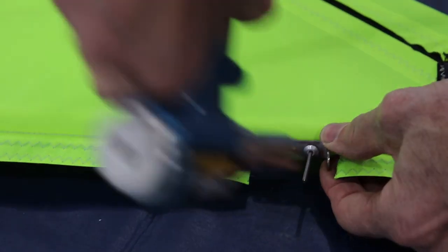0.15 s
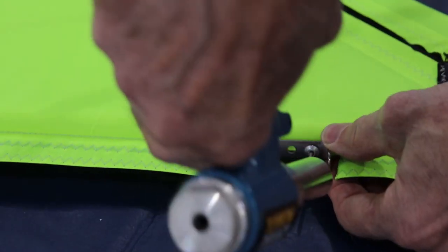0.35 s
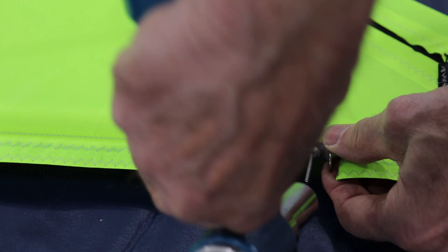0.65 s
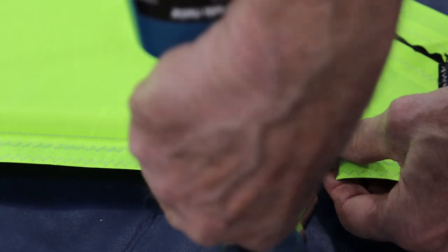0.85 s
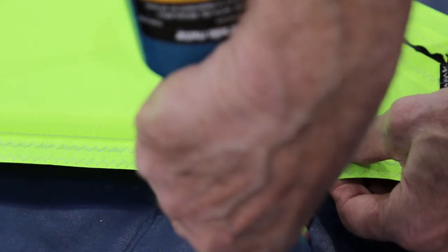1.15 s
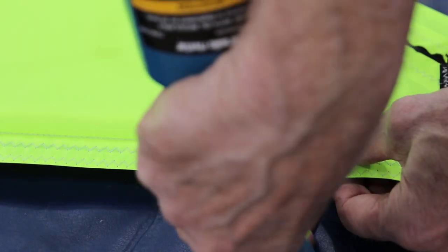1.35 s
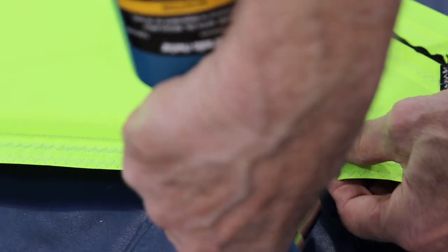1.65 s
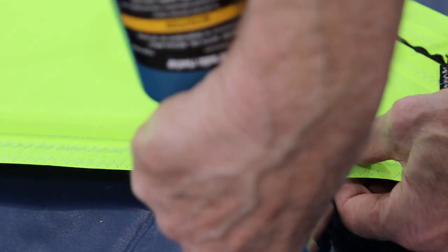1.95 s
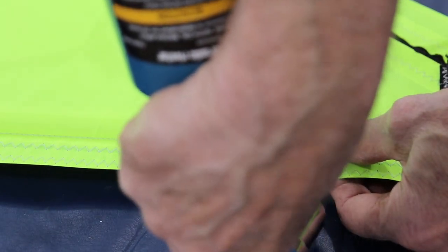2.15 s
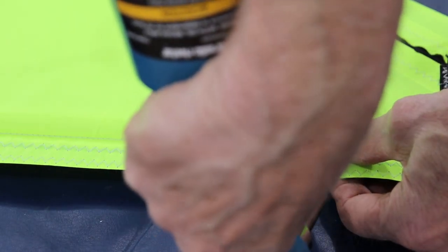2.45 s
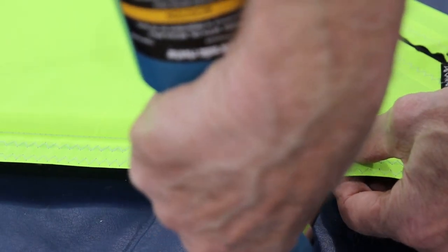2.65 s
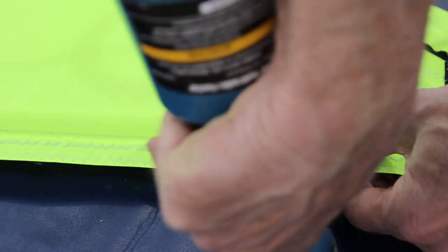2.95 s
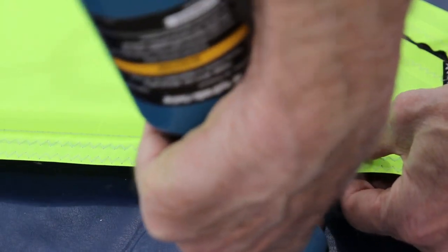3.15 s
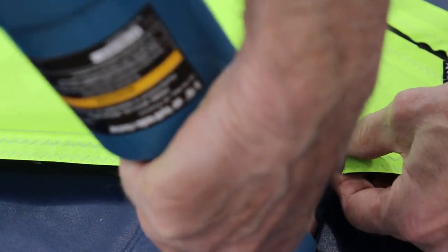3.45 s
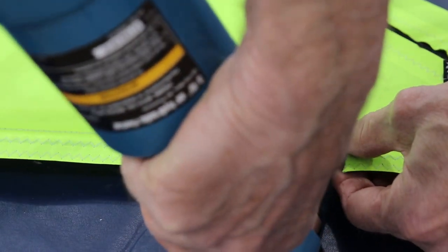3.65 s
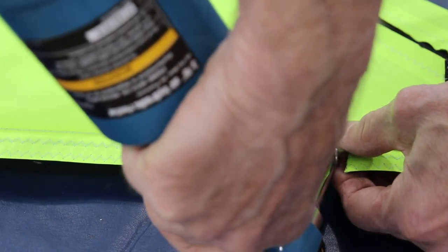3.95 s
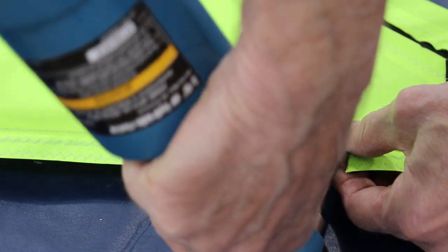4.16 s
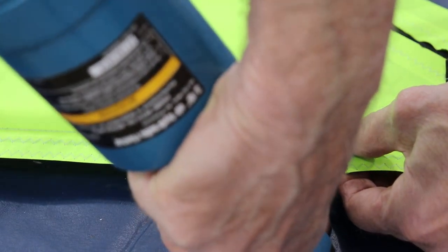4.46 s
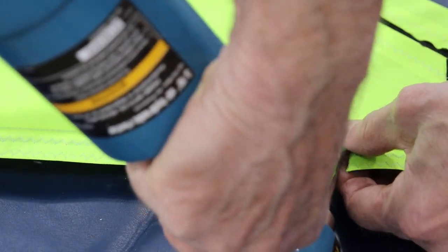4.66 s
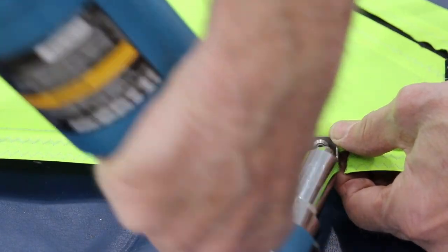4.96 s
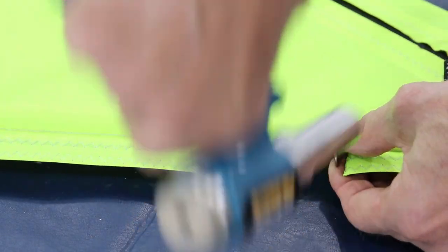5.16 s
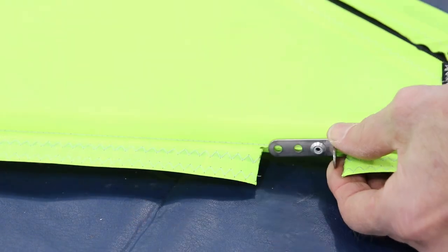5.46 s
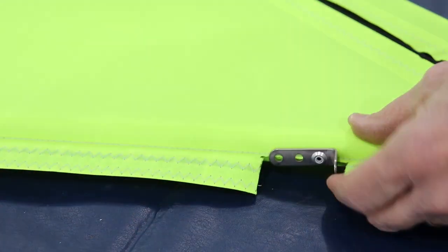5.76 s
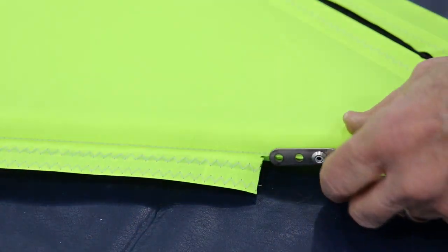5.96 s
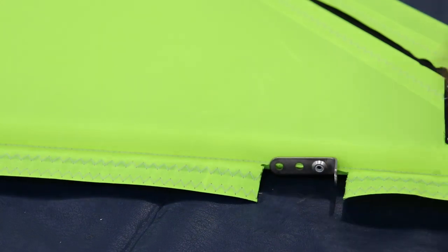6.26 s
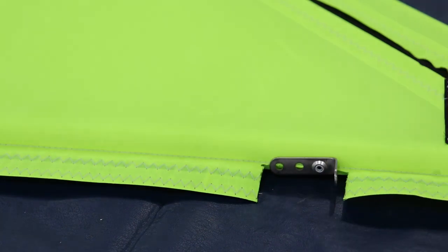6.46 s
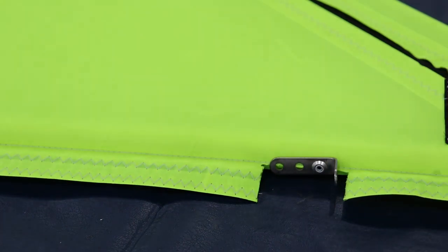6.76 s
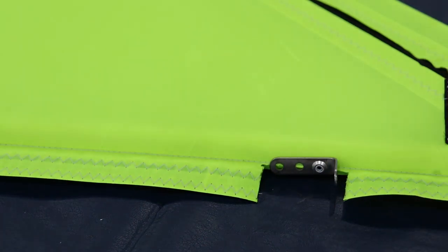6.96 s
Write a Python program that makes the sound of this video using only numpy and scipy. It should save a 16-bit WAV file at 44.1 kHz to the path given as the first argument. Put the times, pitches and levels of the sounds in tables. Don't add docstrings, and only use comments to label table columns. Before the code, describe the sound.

Handling scuffs and metallic ticks, a short burst of compressed air, a violent crack with ringing reverb, then a sweeping jet of venting air ends abruptly.

```python
import sys
import numpy as np
from scipy import signal
from scipy.fft import rfft, irfft, next_fast_len
from scipy.io import wavfile
from scipy.ndimage import map_coordinates

SR = 44100
rng = np.random.default_rng(int(sys.argv[2]) if len(sys.argv) > 2 else 0)


def volts_from_decibels(level):
    exponent = np.asarray(level, float) / 20
    return 10 ** exponent


def put_to_file(sound):
    columns = np.atleast_2d(sound).T
    safe = np.clip(columns, -1, 1)
    whole_steps = np.round(safe * 32767)
    wavfile.write(sys.argv[1], SR, whole_steps.astype(np.int16))


N = 312864
TIME = np.arange(N) / SR
PADDED = next_fast_len(N)
SNAP_S = 4.7418

# frequency in Hz, width in Hz, level in dB.
BODY = [(792, 306, 5.5), (1400, 630, 5.5), (1720, 390, 5.5), (2290, 277, 4.5)]


def unit(x):
    return x / np.sqrt(np.mean(x ** 2) + 1e-20)


def columns(rows):
    s, *rest = np.transpose(rows)
    return [np.interp(TIME, s, c) for c in rest]


def at_hz(points, hz):
    points = np.array(points)
    return np.interp(np.log(hz + 1), np.log(points[:, 0]), points[:, 1])


def noise(spectrum):
    white = rfft(rng.standard_normal(PADDED))
    colour = volts_from_decibels(at_hz(spectrum, np.fft.rfftfreq(PADDED, 1 / SR)))
    return unit(irfft(white * colour, PADDED)[:N])


def band(x, low_hz, high_hz, order=2):
    edges_hz = [low_hz, min(high_hz, .45 * SR)]
    return signal.sosfilt(signal.butter(order, edges_hz, "band", fs=SR, output="sos"), x)


def drift(rate_hz):
    return unit(band(rng.standard_normal(N + SR), rate_hz / 8, rate_hz, order=1)[SR:])


def resonate(x, modes):
    out, power = 0, 0
    for k, (hz, width_hz, db) in enumerate(modes):
        r = np.exp(-np.pi * width_hz / SR)
        poles = [2, -4 * r * np.cos(2 * np.pi * hz / SR), 2 * r * r]
        mode = signal.lfilter([1 - r * r, 0, r * r - 1], poles, x + 1e-18)
        out = out + (-1) ** k * volts_from_decibels(db) * mode
        power += volts_from_decibels(db) ** 2 * np.pi * width_hz / SR
    return out / np.sqrt(power)


def dying(start, t60):
    out, first = np.zeros(N), int(np.ceil(start * SR))
    part = TIME[first:first + int(2 * t60 * SR)] - start
    out[first:first + len(part)] = volts_from_decibels(-60 * part / t60)
    return out


def swell(rows):
    coarse = TIME[::32]
    strokes = sum(volts_from_decibels(db - 25 * np.maximum((s - coarse) / rise, (coarse - s) / fall))
                  for s, rise, fall, db in rows)
    return np.interp(TIME, coarse, strokes)


def split(x, centres_hz):
    spectrum, hz = rfft(x, PADDED), np.log(np.fft.rfftfreq(PADDED, 1 / SR) + 1)
    return [irfft(spectrum * np.interp(hz, np.log(centres_hz), one), PADDED)[:N]
            for one in np.eye(len(centres_hz))]


def ring(modes):
    tones = sum(volts_from_decibels(db) * dying(s, t60) * np.sin(2 * np.pi * hz * (TIME - s)) for s, hz, db, t60 in modes)
    return volts_from_decibels(3.7 * drift(60)) * tones


def shop_air():
    # frequency in Hz, density in dB per Hz.
    air_colour = [(15, -35), (25, -2.5), (166, -2.5), (285, -2.5), (344, -2.5), (405, -4.5), (695, -5.5),
                  (1020, -7.5), (1100, -7), (2550, -11), (3250, -13.5), (12900, -19), (16000, -20)]
    return volts_from_decibels(-41.5 + 0.56 * drift(0.87)) * noise(air_colour)


def shop_air_side():
    # frequency in Hz, density in dB per Hz.
    side_colour = [(15, -29), (25, 5.5), (263, -8), (1260, -14), (9840, -14.5), (11600, -18), (12500, -38),
                   (13600, -23), (16000, -33)]
    return volts_from_decibels(-55) * noise(side_colour)


def coupling_leak():
    # time in seconds, level in dB.
    leak_curve = [(0, -32), (.5, -37), (1.4, -34), (3.38, -38), (3.44, -77), (3.86, -38), (3.95, -60),
                  (4.5, -70)]
    # frequency in Hz, width in Hz, level in dB.
    leak_modes = [(2260, 270, -4.5), (2350, 610, -9.5)]
    level_db = columns([*leak_curve, (4.55, -80)])[0]
    return volts_from_decibels(level_db + 1.3 * drift(37)) * resonate(rng.standard_normal(N), leak_modes)


def reverberation():
    # frequency in Hz, density in dB per Hz.
    hall_colour = [(60, -26), (121, -15), (233, -11), (346, -4.5), (900, -1.5), (1340, -4), (1750, 4.5),
                   (2250, -4.5), (2750, -2.5), (3400, -9), (5590, -10), (7750, -10), (10500, -18),
                   (16000, -31)]
    # frequency in Hz, t60 in seconds.
    hall_t60 = [(100, 0.93), (500, 1.29), (1500, 1.35), (3000, 1.36), (6000, 0.88), (12000, 0.42)]
    centres = np.geomspace(100, 14000, 11)
    parts = split(noise(hall_colour), centres)
    return sum(part * dying(0, at_hz(hall_t60, hz)) for hz, part in zip(centres, parts))


def table(gain):
    # start in seconds, frequency in Hz, level in dB, rise in seconds, t60 in seconds.
    knock_rows = [(3.005, 110, -26, .006, .09), (3.625, 200, -34, .004, .06), (3.625, 65, -33, .006, .1),
                  (.185, 140, -26, .005, .2), (6.472, 62, -28, .006, .25), (4.662, 90, -22, .006, .08),
                  (4.603, 420, -24, .004, .12), (5.41, 200, -30, .01, .15), (5.57, 97, -36, .08, .5),
                  (5.58, 185, -38, .08, .6), (6.47, 165, -19, .008, .13), (6.505, 185, -25, .01, .12),
                  (6.472, 340, -29, .003, .05), (6.579, 310, -18, .002, .035), (6.578, 140, -25, .003, .07)]
    # peak, rise and fall in seconds, level in dB.
    bumps = [
        (0, .1, 2.9, -38),
        (2.97, .1, 0.38, -38),
        (4.6, 0.13, .6, -32.5),
        (5.45, .06, .1, -48),
    ]
    knocks = 0
    for s, hz, db, rise, t60 in knock_rows:
        onset = np.clip((TIME - s) / rise, 0, 1)
        knocks = knocks + volts_from_decibels(db) * dying(s, t60) * onset * np.sin(2 * np.pi * hz * (TIME - s))
    sway = volts_from_decibels(-71) + swell(bumps)
    return knocks + gain * sway * unit(band(rng.standard_normal(N), 5.2, 23.4))


def scuffs(gain):
    # peak, rise and fall in seconds, level in dB,
    # weight on the table in dB.
    rubs = [(0.034, 1, 0.044, -18.5, 0), (0.108, 0.014, 0.068, -27.5, 1.5), (.136, 0.062, 0.013, -24, 5.5),
            (.19, 0.014, 0.93, -43, 4.5), (1.075, .03, 0.067, -42, 2), (1.132, .03, 0.088, -35.5, -16),
            (1.237, 0.026, .09, -32, -22), (1.377, 0.025, 0.087, -32.5, -11), (1.435, 0.027, 0.1, -34, -15),
            (1.693, 0.044, 0.088, -40, -8), (2.58, 0.018, .03, -32, -23), (2.626, 0.047, 0.054, -44, -9),
            (2.88, 0.1, 0.12, -33.5, -11), (2.985, .1, 0.057, -39, -2), (3.03, 0.035, 0.27, -33, -3),
            (3.594, 0.055, 0.12, -39.5, -10), (4.614, 0.096, 0.25, -31.5, 8),
            (4.735, 0.036, 0.015, -40, -6), (5.428, 0.16, 0.018, -21, -10.5),
            (6.36, 0.21, 0.84, -52.5, 12.5), (6.599, 0.022, 0.14, -46.5, 4.5),
            (6.719, 0.096, .02, -53, -16)]
    # peak, rise and fall in seconds, level in dB.
    sleeve = (.42, .9, .8, -44)
    rustle_db, rumble_db, rumble_lingers = -10, -5, 1.53
    body = swell([row[:4] for row in rubs])
    grip = swell([(s, rise, fall, db + weight_db) for s, rise, fall, db, weight_db in rubs])
    rumble = swell([(s, rise, rumble_lingers * fall, db + weight_db + rumble_db)
                    for s, rise, fall, db, weight_db in rubs])
    grit = rng.standard_normal(N) * volts_from_decibels(0.45 * drift(190))
    rustle = volts_from_decibels(rustle_db) * body + swell([sleeve])
    return (body * unit(resonate(grit, BODY))
            + rustle * unit(band(grit, 2600, 6900))
            + gain * rumble * unit(band(rng.standard_normal(N), 78, 270))
            + grip * unit(band(grit, 276, 710)))


def ticks():
    # start in seconds,
    # peak in dB, housing and steel relative to it in dB, t60 in seconds.
    tick_rows = [(0.189, -23, -6, -17, 0.018), (1.054, -9.5, -6.5, -2.5, 0.047),
                 (1.126, -10, -14, -17, 0.042), (1.138, -15, -7, -24, 0.026), (1.237, -18, -10, -16, 0.03),
                 (1.372, -17, -5.5, -21, 0.027), (1.387, -23, -8, 2, 0.035), (1.423, -12, -5, -11, 0.052),
                 (1.441, -15, -6, -24, 0.056), (2.612, -18, -11, -4, 0.036), (3.059, -16, -11, -3, 0.028),
                 (3.629, -31, -7, -15, 0.036),
                 (2.572, -20, -8, 0, .04), (1.409, -5, -6, -14, .035), (2.862, -21, -4, -16, .04),
                  (2.886, -18, -3, -20, .04), (.087, -12, -6, -14, .03), (.101, -12, -4, -14, .05),
                  (2.9965, -10, -6, -6, .025), (3.002, 5, -12, -5, .05), (5.005, -13, -30, 2, .01),
                  (5.08, -11, -30, 2, .012), (6.478, -8, -20, 3, .003), (6.644, -20, -14, 4, .004),
                  (6.664, -13, 0, 0, .005), (6.670, -26, -10, 4, .004), (6.729, -20.5, -25, 5, .016)]
    # frequency in Hz, width in Hz, level in dB.
    steel = [(3500, 2500, 5), (4370, 380, 9), (5620, 860, 12), (7500, 1100, -32), (9800, 1100, -7),
             (12900, 1000, -22)]
    # frequency in Hz, width in Hz, level in dB.
    spring_modes = [(5030, 230, 0), (5760, 720, 1)]
    touches, rattle = tick_rows, rng.standard_normal((3, N))
    rattle[:, [int(np.ceil(row[0] * SR)) for row in touches]] = 3.0
    housing = sum(volts_from_decibels(db + low_db - 3) * dying(s, t60) for s, db, low_db, high_db, t60 in touches)
    nose = sum(volts_from_decibels(db + high_db - 11) * dying(s, .6 * t60) for s, db, low_db, high_db, t60 in touches)
    spring = volts_from_decibels(-37) * dying(3.012, .9)
    return (resonate(housing * rattle[0], BODY) + resonate(nose * rattle[1], steel)
            + resonate(spring * rattle[2], spring_modes))


def steel_rings():
    # start in seconds, frequency in Hz, level in dB, t60 in seconds.
    part_modes = [(0, 1190, -17, .2), (.022, 1230, -17, .1), (3.003, 7570, -42, .15),
                  (3.003, 760, -23, .06), (4.62, 5050, -35, .5), (4.72, 2200, -38, .12),
                  (4.742, 7526, -11, .075), (2.866, 1320, -27, .06), (2.884, 690, -25, .07),
                  (3.006, 1280, -22, .06), (3.056, 1350, -28, .04), (6.729, 9550, -30, .04)]
    return ring(part_modes)


def valve():
    # start, rise, hold and fall t60 in seconds, level in dB.
    puffs = [
        (4.563, 0.014, 0.013, .07, -11.5),
        (4.592, .003, .004, .03, -28),
        (4.661, 0.0047, 0.0027, 0.027, -11.5),
        (5.379, 0.063, 0.0067, 0.18, -11),
    ]
    # frequency in Hz, density in dB per Hz.
    puff_colour = [(180, -53), (300, -11), (528, -14), (1430, -0.5), (2610, -4.5), (3190, 0.5), (8360, 5),
                   (15000, -7.5), (16000, -37)]
    # time in seconds, level in dB.
    fill_curve = [(4.5, -67), (4.56, -38), (4.61, -26), (4.65, -26.5), (4.7, -25.5), (4.74, -31),
                  (4.745, -73)]
    # frequency in Hz, width in Hz, level in dB.
    fill_modes = [(5100, 2700, -8), (7000, 360, 1.5), (9600, 4200, -16.5)]
    shape = 0
    for s, rise, hold, t60, db in puffs:
        opening = np.clip((TIME - s) / rise, 0, 1) ** 2
        closing = volts_from_decibels(-60 * np.maximum(TIME - s - rise - hold, 0) / t60)
        shape = shape + volts_from_decibels(db) * opening * closing
    bursts = shape * volts_from_decibels(0.58 * drift(300)) * noise(puff_colour)
    return bursts + volts_from_decibels(columns(fill_curve)[0]) * resonate(rng.standard_normal(N), fill_modes)


def exhaust():
    # time in seconds, flow in dB, port turned from facing (0) to sideways (1).
    vent = [(5.378, -34, 0.4), (5.47, -24, 0.7), (5.51, -25, 0.01), (5.82, -22, 0.33), (6.0, -23.5, 0.51),
            (6.27, -20, .75), (6.45, -22.5, 0.89), (6.555, -24, .98), (6.59, -38, 0.86)]
    # frequency in Hz, density in dB per Hz.
    jet_colour = [(150, -28), (400, -16.5), (1000, -11), (1800, -8), (3800, 11), (5000, 10.5), (7000, 17.5),
                  (11000, 16.5), (16000, 0)]
    # frequency in Hz, width in Hz, level in dB.
    upper_modes = [(4800, 430, 7.5), (6070, 1400, 1)]
    # frequency in Hz, width in Hz, level in dB.
    lower_modes = [(2150, 450, 0), (2600, 550, -1)]
    # time in seconds, far and near delay in ms.
    echo_ms = [(5.34, 1.15, .45), (5.62, 1.35, .69), (5.72, 1.28, .56), (5.98, 1.0, .19), (6.4, .465, .23),
               (6.52, .37, .21), (6.6, .32, .22)]
    # frequency in Hz, level facing in dB, change when sideways in dB.
    turning = [(1160, -7.5, -8), (2310, -4, 0), (3670, -2.5, -2.5), (5240, 5, -14.5), (7300, 3.5, -15),
               (10200, 6.5, -18.5), (13100, 4, -13.5)]
    (far_ms, near_ms), air = columns(echo_ms), rng.standard_normal(N)
    before, end = (vent[0][0] - .012, -90, 0), (N / SR, -90, 1)
    seep = (vent[-1][0] + .54, -68, 1)
    flow_db, turn = columns([before, *vent, seep, end])

    upper = volts_from_decibels(-3.5 - 48 * (turn - .74) ** 2) * resonate(air, upper_modes)
    lower = volts_from_decibels(-38.5 + 22.5 * turn ** 3) * resonate(resonate(air, lower_modes), lower_modes) / 4
    jet = noise(jet_colour) + upper + lower

    far_echo, near_echo = (map_coordinates(jet, [np.arange(N) - ms * SR / 1000], order=3)
                           for ms in (far_ms, near_ms))
    far = np.clip(.1 + 1.0 * (1.36 - far_ms), 0, .5) * volts_from_decibels(2.3 * drift(11))
    near = .28
    combed = (jet + far * far_echo + near * near_echo) / np.sqrt(1 + far ** 2 + near ** 2)

    gust, out = 0.66 * drift(14), 0
    for part, (hz, facing_db, turn_db) in zip(split(combed, [row[0] for row in turning]), turning):
        level_db = flow_db + facing_db + turn_db * turn + gust + .8 * drift(12)
        out = out + volts_from_decibels(level_db) * unit(part)
    return out


def jaws():
    # start in seconds, frequency in Hz, level in dB, t60 in seconds.
    jaw_modes = [
        (4.742, 7526, -12, .8),
        (4.742, 7538, -19, .8),
        (4.742, 6270, -26, 1.0),
        (4.742, 13100, -42, .7),
    ]
    return ring(jaw_modes)


def snap():
    # frequency in Hz, width in Hz, level in dB.
    crack_modes = [(495, 300, -6), (1850, 480, 5), (3140, 1600, -7), (7640, 6900, -14)]
    return resonate(volts_from_decibels(22) * dying(SNAP_S, .012) * rng.standard_normal(N), crack_modes)


def hall_boom(hall):
    return volts_from_decibels(0.6 * drift(43)) * np.roll(hall, round(SNAP_S * SR)) * (TIME > SNAP_S)


def automatic_gain():
    # start in seconds, depth in dB, attack in seconds, half recovered after in seconds,
    # suddenness of the recovery.
    duck_rows = [
        (0, 1.5, 0.012, .5, 1.2),
        (4.565, 11, 0.068, .4, 1.4),
        (4.74, 32, 0.0055, 0.084, 1.33),
        (5.381, 17.5, 0.19, 0.5, 2.9),
    ]
    ducks = []
    for s, depth_db, attack, half, bend in duck_rows:
        onset = np.clip((TIME - s) / attack, 0, 1)
        recovery = 1 + (np.maximum(TIME - s - attack, 0) / half) ** bend
        ducks.append(depth_db * onset / recovery)
    return volts_from_decibels(3.5 - np.max(ducks, axis=0))


def scene():
    near_wet_db, vent_wet_db = -34, 8.5
    gain, hall = automatic_gain(), reverberation()
    near, jet = scuffs(gain) + ticks() + valve(), exhaust()
    response = hall[:SR] / np.sqrt(SR / 100)
    wet = volts_from_decibels(near_wet_db) * signal.fftconvolve(near + volts_from_decibels(vent_wet_db) * jet, response)[:N]
    background = gain * (hall_boom(hall) + jaws() + shop_air())
    centre = near + wet + steel_rings() + table(gain) + snap() + jet + coupling_leak() + background
    return centre + gain * shop_air_side() * np.array([[1], [-1]])


def top_cut(x):
    return signal.sosfilt(signal.butter(12, 16480, fs=SR, output="sos"), x)


def record(dry):
    overloaded = abs(TIME - SNAP_S - .01) < .011
    sag = .11 + .27 * np.clip((TIME - SNAP_S) / .008, 0, 1)
    limit = .86 - sag * overloaded
    low_pass = signal.ellip(10, .2, 60, 15850, fs=SR, output="sos")
    mix = np.clip(signal.sosfilt(low_pass, dry), -limit, limit)
    return top_cut(mix)


dry = scene()
out = record(dry)
put_to_file(out)
```